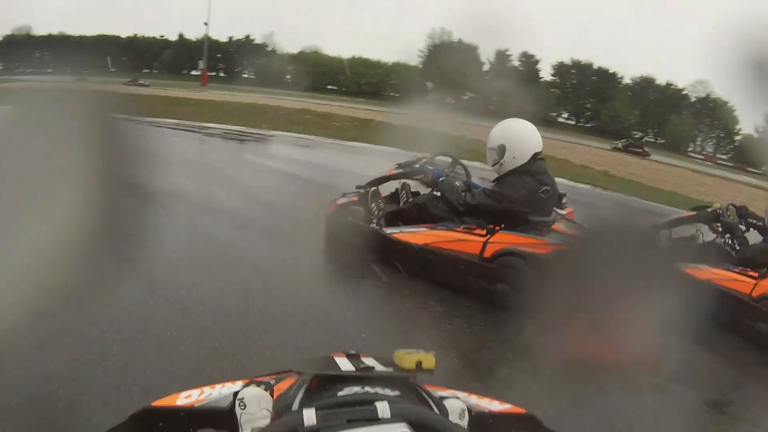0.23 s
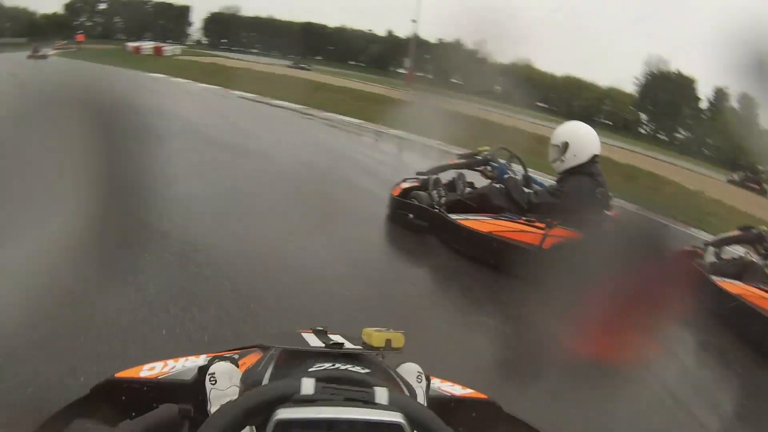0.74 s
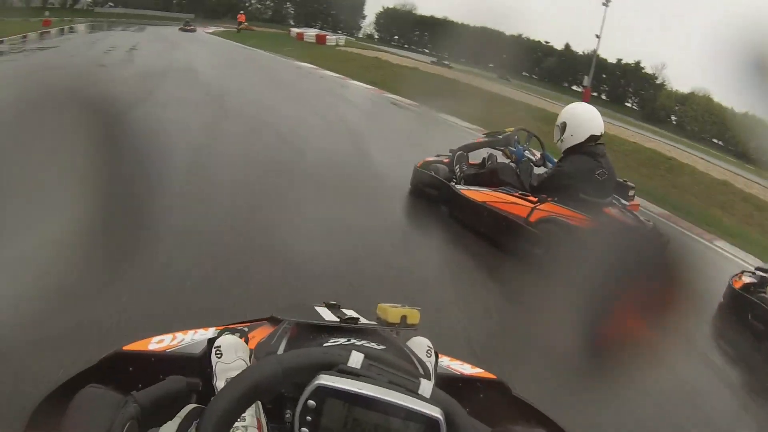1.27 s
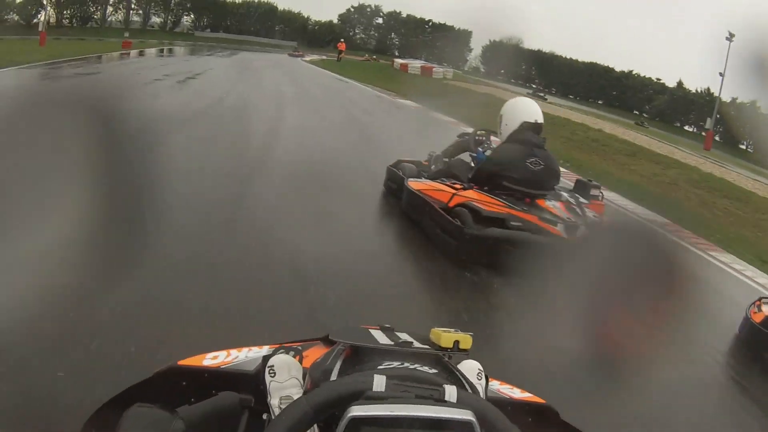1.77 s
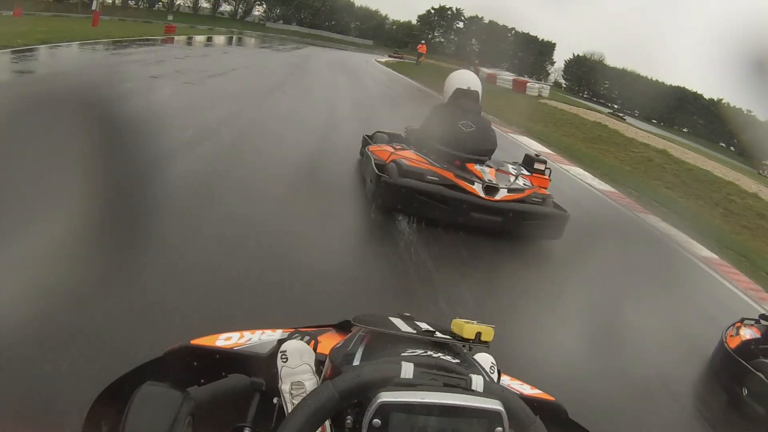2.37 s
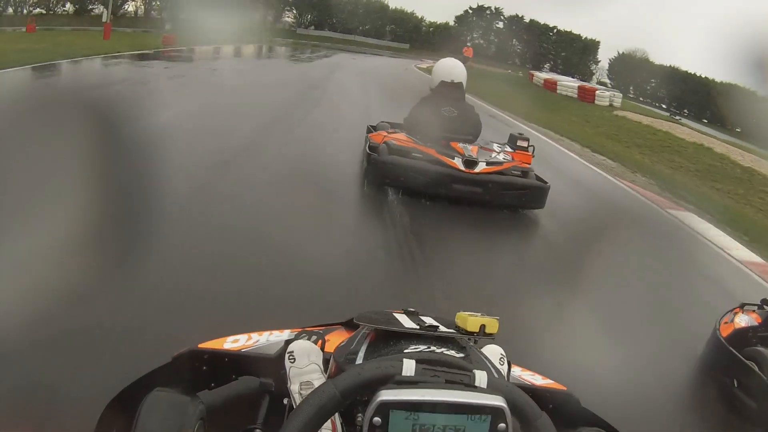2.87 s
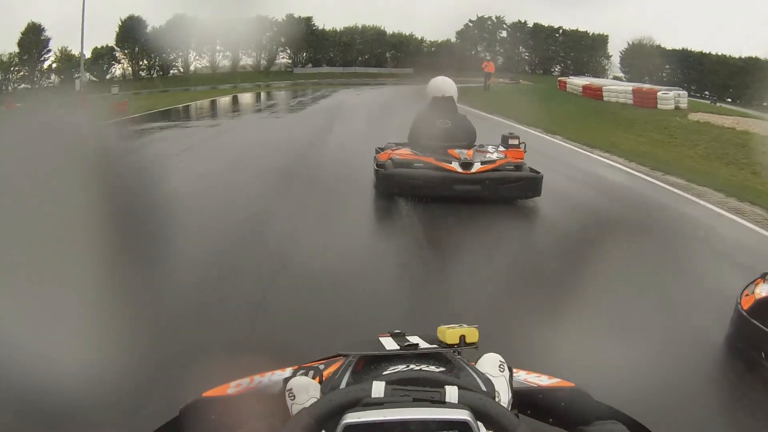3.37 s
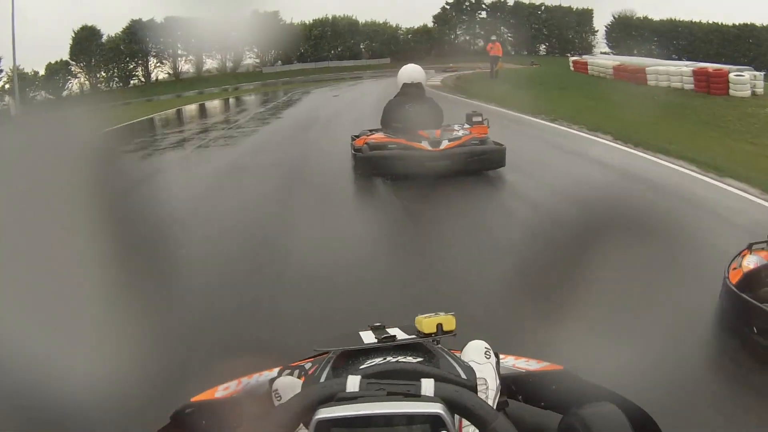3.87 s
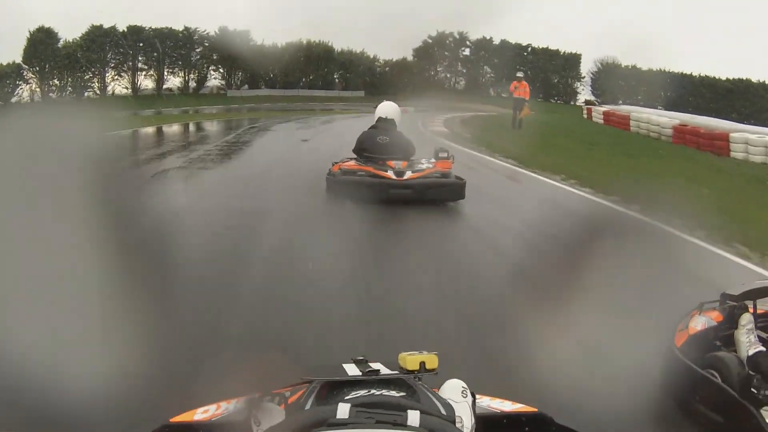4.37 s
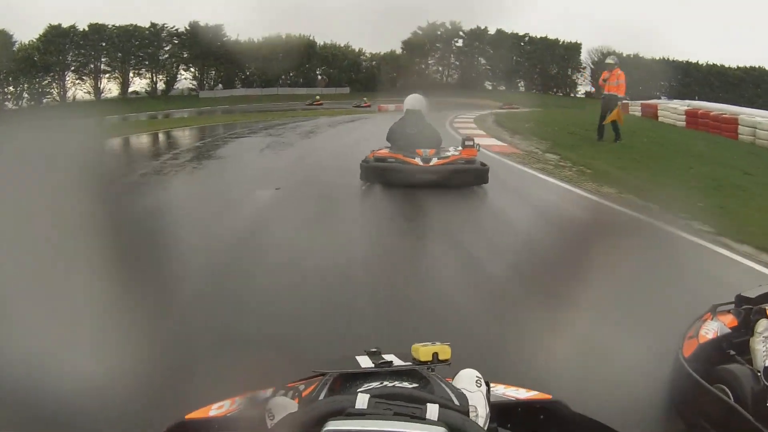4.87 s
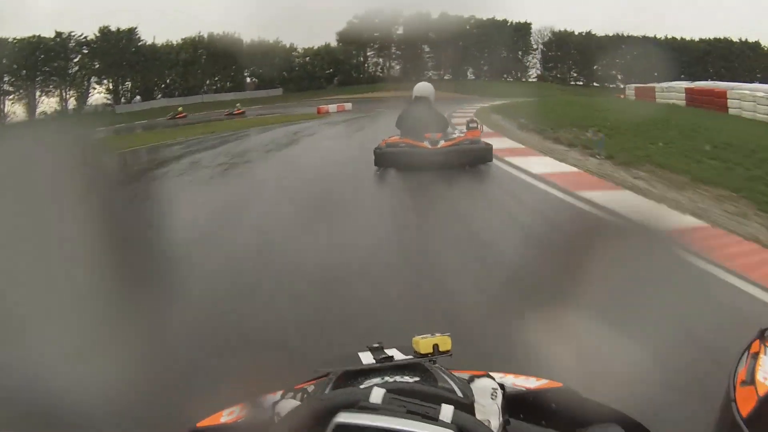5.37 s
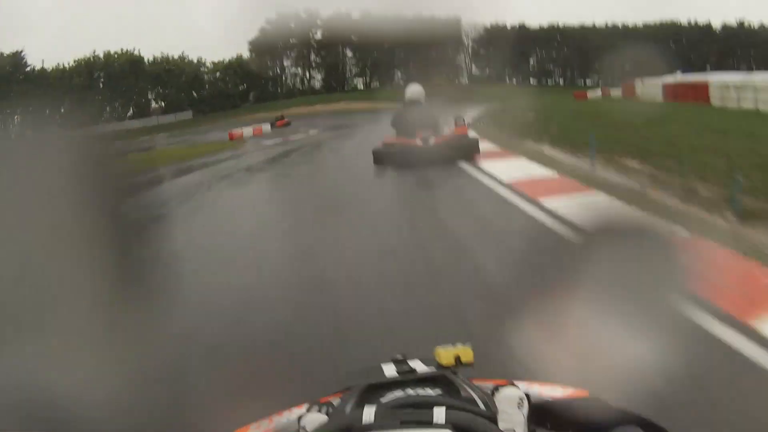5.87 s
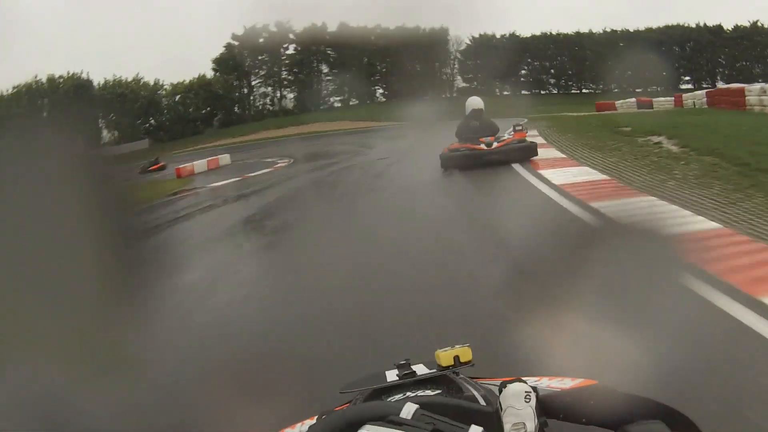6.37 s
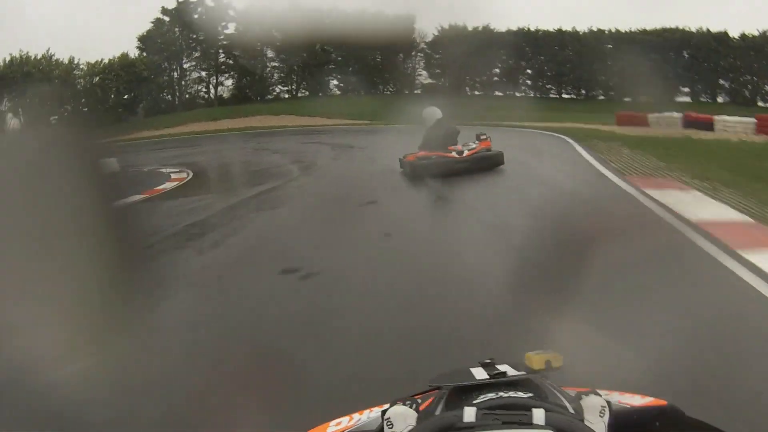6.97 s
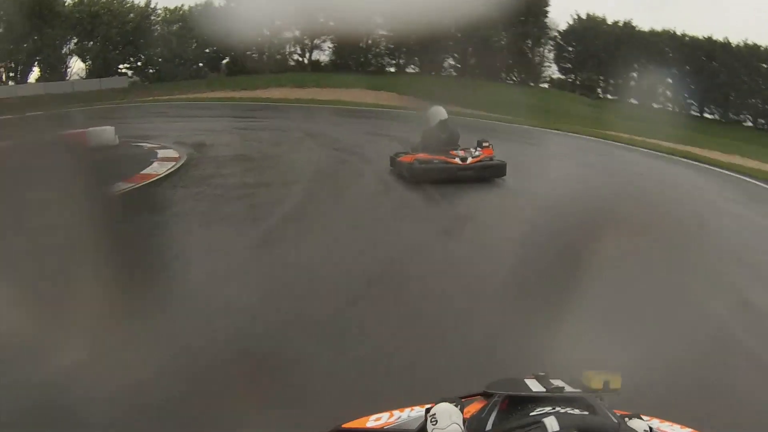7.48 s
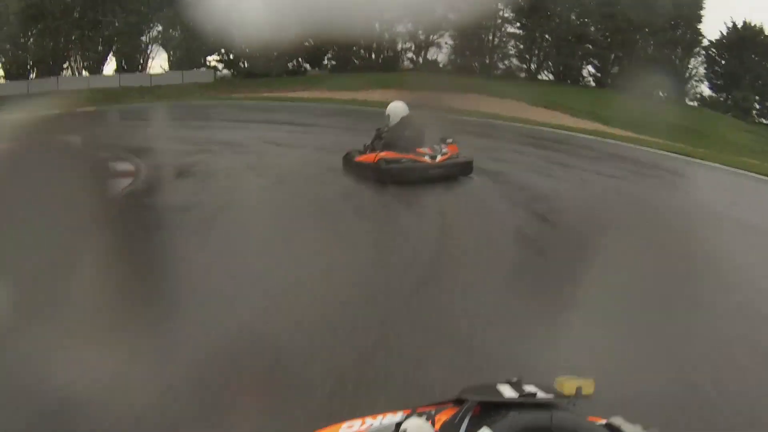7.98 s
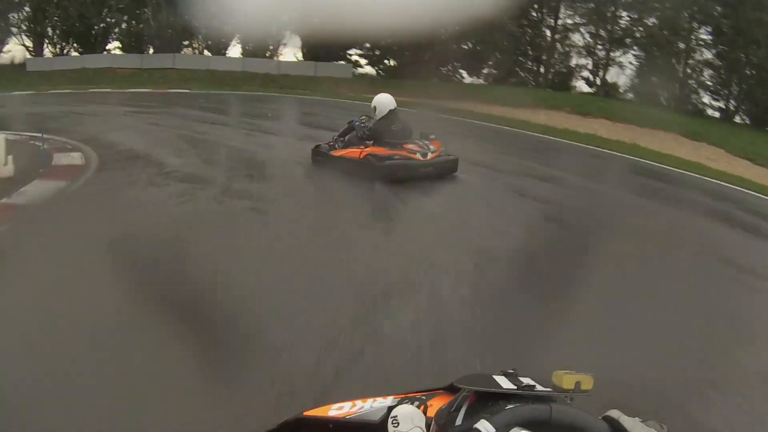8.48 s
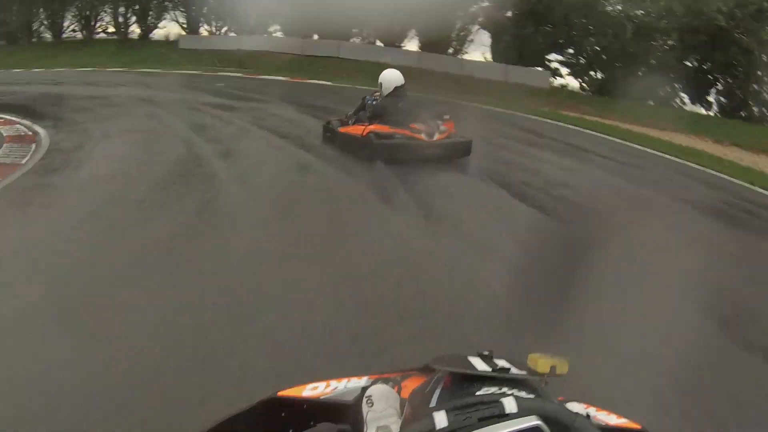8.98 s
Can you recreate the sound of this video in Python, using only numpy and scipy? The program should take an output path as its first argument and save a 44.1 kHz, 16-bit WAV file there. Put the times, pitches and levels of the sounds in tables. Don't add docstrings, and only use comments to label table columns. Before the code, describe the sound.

A close, boxy, muffled onboard sound on a wet outdoor kart track: a couple of hard knocks, then a single-cylinder engine throbs under load and gradually speeds up to a fast purr. Around the middle the drive slackens and the revs slowly fall, leaving more coasting wind, hiss of spray, thin wavering chain whine and sharp little ticks, with slight engine pull returning at the end.

```python
import sys
import numpy as np
from scipy import signal
from scipy.fft import rfft, irfft
from scipy.io import wavfile
from scipy.ndimage import uniform_filter1d

SR = 44100
rng = np.random.default_rng(int(sys.argv[2]) if len(sys.argv) > 2 else 0)


def decibels_to_gain(level_db):
    exponent = np.asarray(level_db, float) / 20
    return 10 ** exponent


def wav_out(sig):
    wavfile.write(sys.argv[1], SR, np.round(np.clip(np.atleast_2d(sig).T, -1, 1) * 32767).astype(np.int16))


N = 406602
LIFT_S = 5.5

# centre in Hz, width in Hz, level in dB.
CAVITIES = [(455, 265, -11), (691, 87, -9.5), (889, 162, -11), (1522, 360, -0.5), (2207, 415, -6),
            (2425, 530, -8), (3050, 450, -16), (3590, 850, -16), (4206, 710, -15.5), (4890, 710, -18),
            (5330, 430, -32), (6710, 1200, -25.5), (7530, 1100, -28), (11000, 1700, -42)]
# time in s, firing kick in dB, crank throw in dB.
EFFORT_CURVE = [(0, -56, -58), (.5, -46, -64), (.65, -30, -37), (1.6, -26, -32), (2.5, -23.5, -27),
                (3.25, -28.5, -41.5), (3.5, -26.5, -33.5), (4.1, -33, -32), (4.5, -26, -29),
                (5.3, -30.5, -29), (5.6, -44.5, -42), (6.2, -42.5, -39.5), (6.7, -33.5, -36),
                (7.2, -49, -43), (8, -58, -42), (8.25, -46, -33), (8.8, -42, -36.5), (9.22, -31, -29.5)]


def curves(table):
    s, *columns = np.transpose(table)
    return [np.interp(np.arange(N) / SR, s, c) for c in columns]


def ramp(end_s, length_s):
    return np.clip((end_s - np.arange(N) / SR) / length_s, 0, 1)


def unit(x):
    return x / np.sqrt(np.mean(x ** 2))


def decay(t, t60):
    return np.exp(-np.log(1000) * t / t60)


def place(out, s, sound):
    start = int(s * SR)
    out[start:start + len(sound)] += sound


def log_interp(hz, points):
    point_hz, point_db = np.transpose(points)
    return np.interp(np.log(hz), np.log(point_hz), point_db)


def band(x, lo_hz, hi_hz):
    return signal.sosfilt(signal.butter(3, [lo_hz, hi_hz], "band", fs=SR, output="sos"), x)


def walk(rate):
    k = int(SR / rate)
    held = np.repeat(rng.standard_normal(N // k + 1), k)
    return 0.902 * uniform_filter1d(uniform_filter1d(held, k), k)[:N]


def grit(rate, spread_db):
    chance = rng.random((2, N))
    size = decibels_to_gain(-spread_db * np.log(chance[1] + 0.018))
    return rng.standard_normal(N) * (1 + (chance[0] < rate / SR) * size)


def bursts(table, rise_s):
    out, t = np.zeros(N + SR), np.arange(SR // 8) / SR
    for s, db, t60 in table:
        fade = decay(t, max(t60, .005)) * np.minimum(t / rise_s, 1)
        place(out, s, decibels_to_gain(db) * fade * rng.standard_normal(len(t)))
    return out[:N]


def housing(x, cavities=CAVITIES, leak_db=0):
    # frequency in Hz, level in dB.
    leak_points = [(100, -4.5), (250, -12.5), (700, -13.5), (1050, -20), (1850, -23.5), (3000, -24.5),
                   (5500, -20), (6000, -29.5), (8500, -35.5), (10000, -42.5), (13000, -50), (14800, -61),
                   (15600, -75)]
    f = np.maximum(np.fft.rfftfreq(4096, 1 / SR), 1)
    power = decibels_to_gain(2 * (leak_db + log_interp(f, leak_points)))
    for hz, width, db in cavities:
        power = power + decibels_to_gain(2 * db) / (1 + ((f - hz) / width * 2) ** 2) ** 3
    cepstrum = irfft(np.log(power) / 2)
    cepstrum[1:2048] *= 2
    cepstrum[2049:] = 0
    response = irfft(np.exp(rfft(cepstrum)))[:2048]
    return signal.fftconvolve(x, response)[:N]


def drizzle(db):
    chance = rng.random((2, N))
    hits = (chance[0] < 25 / SR) * decibels_to_gain(-2.2 * np.log(chance[1] + .03))
    tick = np.exp(-np.arange(100) / SR / 0.00033)
    return decibels_to_gain(db - 3.0) * band(signal.fftconvolve(hits, tick)[:N] * rng.standard_normal(N), 8000, 14400)


def drops():
    # time in s, peak in dB, dullness in dB.
    drop_hits = [(0.1895, -50, 15), (0.4284, -48, 16), (0.5671, -42, 18), (0.6365, -38, 7),
                 (0.7527, -49, 15), (1.0036, -47, 6), (1.9714, -23, 14), (2.3126, -48, 17),
                 (4.623, -23, 18), (4.6503, -24, 2), (4.9107, -42, 10), (5.0384, -22.5, 18),
                 (5.672, -32, 8), (5.7364, -28, 19), (6.2108, -39, 7), (6.4817, -32, 8), (6.6435, -29, 4),
                 (6.6977, -44, 10), (7.5602, -37, 10), (7.7044, -21, -3), (7.8361, -39, 11.5),
                 (8.316, -41, 23), (8.3529, -43, 9), (8.6288, -27, 6), (8.6547, -42, 7),
                 (8.7286, -31.5, 10), (8.8852, -39, 9), (9.0902, -48, 28)]
    bright, dull, t = np.zeros(N), np.zeros(N), np.arange(200) / SR
    for s, db, dull_db in drop_hits:
        tick = rng.choice([-1, 1], len(t)) * np.exp(-t / 0.001)
        place(bright, s, decibels_to_gain(db - 5.5) * tick)
        place(dull, s, decibels_to_gain(db + min(dull_db, 18) - 9) * tick)
    return band(bright, 7300, 12200) + band(dull, 1500, 7500)


def buffet(air_db, idling):
    # frequency in Hz, density in dB per Hz.
    buffet_spectrum = [(2, -11), (8, -14), (17, 1.5), (40, 0.5), (75, -1), (95, 1), (112, -2), (125, -15.5),
                       (150, -30), (250, -70)]
    # centre in s, level over the buffet in dB, length in s.
    gust_events = [
        (.42, 4.5, .15),
        (1.9, 8, 0.13),
        (2.4, 5.5, 0.33),
        (3.6, -3, .5),
        (5.6, -1, 0.18),
        (5.903, 6, 0.27),
        (6.3, 7.5, 0.13),
        (7.4, -2.5, .3),
        (7.802, 6, 0.22),
        (9.028, 9, 0.092),
    ]
    t = np.arange(N) / SR
    gusts_db = sum(db * np.exp(-((t - s) / length * 2) ** 2) for s, db, length in gust_events)
    db = -30.5 + 0.55 * (air_db + 38.5) + gusts_db + 1.7 * walk(9) + 3.8 * walk(18) - 0.5 * idling
    f = np.maximum(np.fft.rfftfreq(N, 1 / SR), 1)
    noise = irfft(rfft(rng.standard_normal(N)) * decibels_to_gain(log_interp(f, buffet_spectrum)), N)
    return unit(noise) * decibels_to_gain(db)


def roar(db, gate, gust):
    flow = band(grit(140, 5.7), 104, 957) * decibels_to_gain(0.28 * gust + 0.63 * walk(27)) * gate ** 0.48
    return unit(housing(flow)) * decibels_to_gain(db)


def spray(db, gate, gust):
    hits = band(grit(400, 2.0), 2736, 5580) * decibels_to_gain(0.16 * gust + 1.1 * walk(30)) * gate ** 0.42
    return unit(housing(hits)) * decibels_to_gain(db)


def mist(db, gate, gust):
    hits = band(grit(400, 3.5), 5640, 19100) * decibels_to_gain(0.14 * gust + 0.53 * walk(30)) * gate ** 0.39
    return unit(housing(hits)) * decibels_to_gain(db)


def knocks():
    # mode in Hz, level in dB, t60 in s.
    shell_modes = [(687, -3, 0.37), (885, 0, 0.082), (1290, -2.5, 0.14), (1566, 0, 0.12), (1596, -3, 0.029),
                   (2350, 2, 0.14)]
    # time in s, peak in dB, t60 in s.
    blow_events = [
        (0.4271, -15, 0.071),
        (0.568, -11.5, 0.087),
    ]
    # time in s, peak in dB.
    hard_firings = [(0.7522, -12.5), (0.8799, -12), (1.053, -11), (1.1293, -10), (1.1902, -7), (1.377, -21),
                    (1.695, -9.5), (1.949, -9.5), (2.4384, -9.5), (2.4942, -13), (2.9083, -13),
                    (3.0205, -6), (3.0749, -11), (3.7025, -10), (3.8487, -7), (4.1709, -5)]
    # time in s, peak in dB, pitch in Hz, t60 in s.
    grit_ticks = [
        (1.9704, -17, 1510, 0.018),
        (2.037, -12, 1270, 0.02),
        (4.6503, -10, 2150, 0.018),
        (5.4324, -10.5, 1490, 0.017),
        (5.7354, -16, 1570, 0.013),
        (8.317, -11, 2520, 0.011),
        (8.7293, -19, 1420, 0.012),
        (8.7445, -17, 1500, 0.012),
        (9.0907, -7.5, 2480, 0.009),
    ]
    t, tones = np.arange(SR // 8) / SR, np.zeros(N + SR)
    ring = sum(decibels_to_gain(db) * np.sin(2 * np.pi * hz * t) * decay(t, min(t60, .1)) for hz, db, t60 in shell_modes)
    thump = np.sin(2 * np.pi * 70 * t) * decay(t, 0.13)
    for s, db, _ in blow_events:
        place(tones, s, decibels_to_gain(db - 10.0) * (ring * np.minimum(t / 0.0014, 1) + thump))
    for s, db, hz, t60 in grit_ticks:
        place(tones, s, decibels_to_gain(db) * np.sin(2 * np.pi * hz * t) * decay(t, t60))
    shell = decibels_to_gain(13.0) * housing(band(bursts(blow_events, 0.002), 350, 3900))
    firing_rows = [(s, db, 0.054) for s, db in hard_firings]
    firings = decibels_to_gain(10.0) * housing(band(bursts(firing_rows, 0.0025), 680, 3000))
    crack_rows = [(s, db, t60) for s, db, _, t60 in grit_ticks]
    crack = decibels_to_gain(12.5) * housing(band(bursts(crack_rows, 0.00018), 1000, 5600))
    return shell + firings + crack + tones[:N]


def chain(turns):
    # time in s, tooth rate in Hz, whine in dB.
    chain_curve = [(0, 390, -51), (2, 395, -50), (2.8, 435, -46), (3.3, 468, -45), (3.75, 530, -37),
                   (4.4, 595, -43), (4.8, 632, -56), (5.4, 672, -45), (6.2, 665, -44.5), (6.8, 672, -42.5),
                   (7.2, 648, -43), (7.55, 602, -42.5), (7.85, 605, -46), (8.3, 572, -47),
                   (8.6, 557, -37.5), (8.95, 536, -39.5), (9.22, 540, -38)]
    hz, db = curves(chain_curve)
    tension = 1 + 0.39 * np.cos(2 * np.pi * turns + 2.4 * walk(3.5))
    teeth = np.cumsum(hz * (1 + 0.0078 * walk(7))) / SR + 0.18 * walk(40)
    whine = np.cos(2 * np.pi * teeth)
    sprocket = decibels_to_gain(-5) * ramp(LIFT_S, .2) * np.cos(2 * np.pi * 1.225 * teeth)
    return np.sqrt(2) * decibels_to_gain(db + 3.1 * walk(30) + 1.5 * walk(8.5)) * tension * (whine + sprocket)


def puffs(hz, turns, throttle):
    valve = 0.618 - 0.26 * np.clip((hz - 19.5) / 3, 0, 1)
    cycle = turns - valve + 1
    size = decibels_to_gain(.9 * rng.standard_normal((400, 2)))[cycle.astype(int)].T
    phase = cycle % 1
    blow = size[0] * np.exp(-phase / 0.28) + 0.18 * size[1] * np.exp(-((phase - .45) / 0.16) ** 2)
    gate = 1 + 3.5 * np.clip(throttle, 0, 2) * uniform_filter1d(blow, int(0.0036 * SR))
    return gate / np.sqrt(uniform_filter1d(gate ** 2, SR // 4))


def rattle(db, hz, gate, gust):
    # centre in Hz, width in Hz, level in dB.
    port_peaks = [(1367, 293, -3), (1650, 160, -5.5), (2042, 340, -7.5)]
    wind = np.clip(0.37 + 0.067 * (hz - 16), 0, .95)
    puffed = band(grit(300, 1.2), 1070, 3040) * decibels_to_gain(0.99 * gust + 0.3 * walk(40)) * gate
    blown = band(grit(300, 5.5), 1080, 2680) * decibels_to_gain(0.23 * gust + 0.83 * walk(40)) * gate ** 0.63
    puffed = unit(housing(puffed, leak_db=5.5))
    blown = unit(housing(blown, CAVITIES + port_peaks))
    return decibels_to_gain(db) * (np.sqrt(1 - wind) * puffed + np.sqrt(wind) * blown)


def shake(hz, turns, throttle):
    # frequency in Hz, gain in dB.
    mount_gain = [(16, -13), (25, 3.5), (47, 7), (57, -11), (70, 4.5), (88, 8.5), (115, 0), (160, -26)]
    order_levels = [7, 4, -2, -7, -11, -9]
    upper_levels = [-46.5, -44, -55]
    coast_change = [0, -4, 1, 8, 0, 0]
    # lead at 16 Hz in turns, drift in turns per Hz, coasting change in turns.
    order_timing = [(.35, .017, 0), (.33, .012, .38), (.34, -.028, -.1), (.8, 0, -.15), (.82, -.05, 0),
                    (.05, .1, 0)]
    slip_loss_db = [4, 20, 0, 0, 7, 0]
    effort, slip = curves(EFFORT_CURVE), ramp(2.6, 1.9)
    coasting = 1 - ramp(LIFT_S + 0.081, 0.45)
    spinning = coasting * ramp(9.15, 0.37)
    levels, lead = [], []
    for k, db in enumerate(order_levels):
        passed_db = db + effort[k % 2] + log_interp((k + 1) * hz, mount_gain)
        levels.append(passed_db + coast_change[k] * spinning - slip_loss_db[k] * slip)
    for turn, drift, lift in order_timing:
        lead.append(turn + drift * (hz - 16) + lift * coasting)
    for db in upper_levels:
        levels.append(db + 20 * np.log10(throttle) + 1.8 * walk(4.0))
        lead.append(rng.random())
    lumpy_db = .8 + 3.5 * np.clip(1 - 2 * throttle, 0, 1)
    return np.sqrt(2) * sum(decibels_to_gain(db + lumpy_db * walk(12)) * np.cos(2 * np.pi * ((k + 1) * turns + lead[k]))
                            for k, db in enumerate(levels))


def scene():
    # time in s, firings per second in Hz.
    rev_curve = [(0.0, 17.71), (0.6, 16.08), (1.8, 16.0), (2.3, 16.27), (2.8, 17.24), (3.3, 18.98),
                 (3.8, 20.31), (4.3, 22.3), (5.2, 25.5), (5.5, 25.9), (5.9, 26.0), (6.4, 25.3),
                 (6.8, 26.07), (7.1, 24.45), (7.5, 23.76), (8.5, 21.62), (8.9, 20.54), (9.22, 20.86)]
    # time in s, opening from 0 to 1.
    throttle_curve = [(0, 0.04), (.55, 0.2), (.6, 0.9), (2.0, 0.77), (3.0, 0.62), (5.4, 0.3), (5.55, 0.26),
                      (8.8, 0.01), (9.22, 0.13)]
    # time in s, level in dB.
    air_curve = [(0, -42), (.3, -41.5), (.62, -39.5), (1.4, -39), (2.2, -37.5), (2.7, -36.5), (3.6, -34.5),
                 (4.7, -34), (5.4, -34), (6.3, -35.5), (7.1, -36.5), (7.5, -38), (8, -39), (8.9, -37),
                 (9.22, -38)]
    (hz,), (throttle,), (air_db,) = curves(rev_curve), curves(throttle_curve), curves(air_curve)
    turns = np.cumsum(hz) / SR
    idling = ramp(0.61, 0.056)
    effort_db = np.maximum(np.max(curves(EFFORT_CURVE), axis=0), -44)
    rattle_db = air_db + 8.5 - 4 * idling
    roar_db = air_db - 0.01 + 0.22 * (effort_db + 44.5) + 2 * idling
    mist_db = -47 + 1.42 * (air_db + 37.5)
    gate, gust = puffs(hz, turns, throttle), walk(15)
    water = drizzle(mist_db) + drops() + spray(air_db - 0.3, gate, gust) + mist(mist_db, gate, gust)
    wind = buffet(air_db, idling) + roar(roar_db, gate, gust)
    engine = shake(hz, turns, np.clip(throttle, .02, 2)) + rattle(rattle_db, hz, gate, gust)
    return (water + wind + knocks() + chain(turns) + engine)[None]


def roll_off(x):
    return signal.sosfilt(signal.butter(12, 15700, fs=SR, output="sos"), x)


def record(dry):
    low_pass = signal.ellip(8, .2, 60, 15550, fs=SR, output="sos")
    return roll_off(signal.sosfilt(low_pass, dry))


dry = scene()
out = record(dry)
wav_out(out)
```